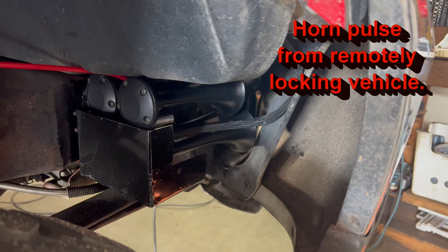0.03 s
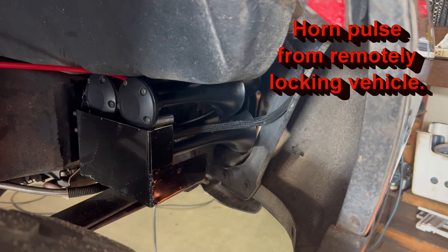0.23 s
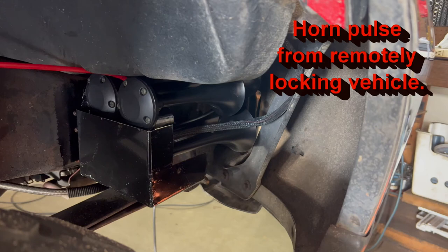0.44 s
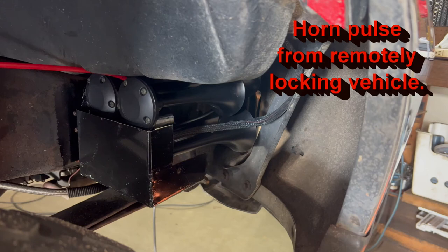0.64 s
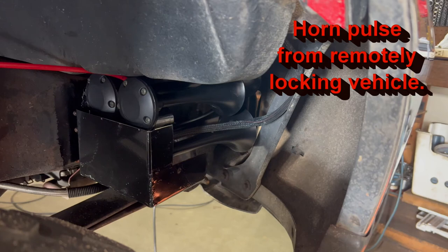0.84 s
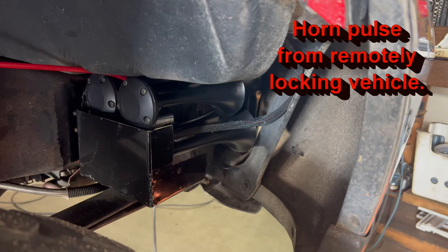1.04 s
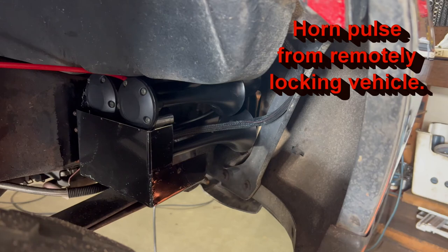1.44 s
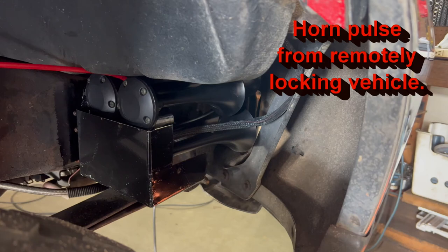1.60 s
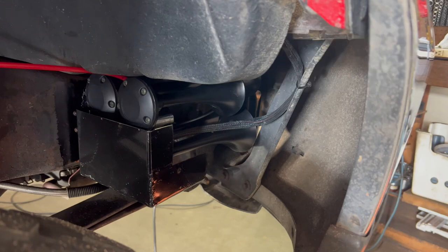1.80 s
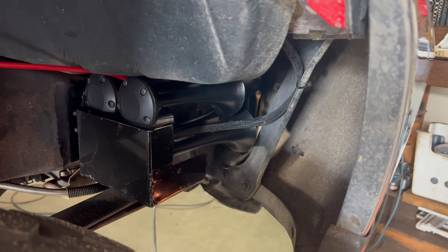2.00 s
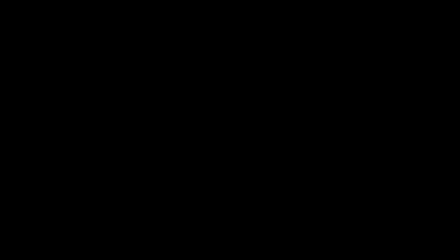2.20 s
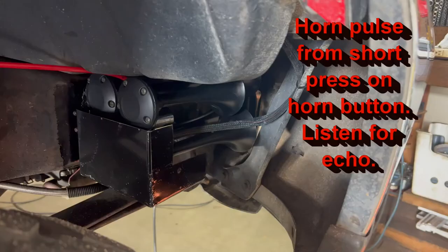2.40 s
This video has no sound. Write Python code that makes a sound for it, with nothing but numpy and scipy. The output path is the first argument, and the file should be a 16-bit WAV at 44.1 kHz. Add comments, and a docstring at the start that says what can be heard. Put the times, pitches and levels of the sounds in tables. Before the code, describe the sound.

An air horn under a vehicle gives one loud, very short two-tone blast at about 0.25 seconds, close up, with a pop and spit of air. Its echo holds until around 0.6 seconds and fades by about 1.2. Faint rustles, ticks and soft thuds follow over a quiet low rumble, with a light scuff at 2.1 seconds, a momentary dropout at 2.3 and a dull knock at 2.4.

```python
"""Under a vehicle, close up: a two-trumpet air horn gives one very short blast.
The valve pops and spits air, two diaphragms buzz a 40 ms chord into flared pipes,
and the surroundings ring on with near and far reflections. Later come faint rustles,
ticks, soft thuds and a scuff over a low rumble; the sound drops out once, briefly."""
import sys
import numpy as np
from scipy import signal
from scipy.fft import rfft, irfft
from scipy.io import wavfile
from scipy.ndimage import uniform_filter1d

SR = 44100
rng = np.random.default_rng(int(sys.argv[2]) if len(sys.argv) > 2 else 0)


def unload_wav(signal):
    """Save mono or channel-first audio to the path in sys.argv[1] as 16-bit WAV at rate SR, clipped to [-1, 1]."""
    wavfile.write(
        sys.argv[1],
        SR,
        np.round(np.clip(np.atleast_2d(signal).T, -1, 1) * 32767).astype(np.int16),
    )


N = 112454
T, HZ = np.arange(N) / SR, np.fft.rfftfreq(N, 1 / SR)

# Left-right likeness of noise and echoes: freq_hz, correlation
STEREO_CORRELATION = [(60, .95), (200, 0.67), (400, 0.52), (800, .25), (3000, 0.26), (15000, .35)]
# Background rumble: freq_hz, density_db
RUMBLE_SPECTRUM = [(25, -10.5), (45, -4), (65, 0.5), (100, -1), (150, -10.5), (220, -13), (350, -21.5),
                   (600, -27.5), (1100, -33.5), (2500, -40), (7000, -43), (16000, -57.5)]
# Its envelope: time_s, level_db
RUMBLE_LEVEL = [(0, -69.5), (.5, -64.5), (1.1, -65), (1.5, -61.5), (1.75, -68), (2.15, -63.5), (2.5, -60)]
# Low roll after the blast: freq_hz, density_db
ROLL_SPECTRUM = [(25, -15), (60, 0), (150, 0.5), (250, -6.5), (500, -43.5), (2000, -75)]
# Its envelope: time_s, level_db
ROLL_LEVEL = [(.48, -85), (.53, -51.5), (.65, -53), (.8, -66), (1.0, -81)]
# Rustle: freq_hz, density_db
RUSTLE_SPECTRUM = [(100, -3.5), (350, 0.5), (700, -2), (1300, -6.5), (2200, -12), (4500, -17.5),
                   (8000, -19), (12000, -28), (16000, -34)]
# Its envelope: time_s, level_db
RUSTLE_LEVEL = [(1.0, -89.5), (1.26, -77), (1.285, -68), (1.34, -66), (1.39, -65), (1.44, -68),
                (1.55, -73.5), (1.59, -68.5), (1.66, -76.5), (1.882, -77.5), (1.889, -61.5), (2.03, -60.5),
                (2.1, -62.5), (2.27, -68.5), (2.315, -84), (2.375, -69), (2.39, -52.5), (2.44, -55.5),
                (2.55, -63)]
# Dull rub: freq_hz, density_db
RUB_SPECTRUM = [(200, -9), (600, -1), (1200, -1), (2200, -11.5), (5000, -21), (12000, -35)]
# Bright scuff and ticks: freq_hz, density_db
SCUFF_SPECTRUM = [(800, -19), (2000, -5.5), (3200, -5), (4200, -5), (5500, 3), (6800, -1), (8500, -0.5),
                  (12000, -6), (16000, -8.5)]
# Ticks: start_s, level_db
TICKS = [(1.274, -72), (1.501, -62.5), (1.772, -71)]
# Soft thuds: start_s, boom_db, knock_hz, knock_db, boom_t60_s, tap_db
THUDS = [(1.418, -68, 400, -58.5, .2, -72.5), (1.582, -69.5, 600, -73, 0.23, -70),
         (1.814, -71, 330, -71, 0.16, -84), (1.886, -50, 185, -41, 0.63, -47),
         (2.015, -62, 328, -62, 0.25, -56.5), (2.383, -41.5, 330, -32, 0.7, -57)]
# Boom of a thud: knock_pitch_ratio, density_db
BOOM_SPECTRUM = [(.12, -9), (.3, -8.5), (.7, -4), (1, -3), (1.6, -11), (3, -36.5), (8, -49), (30, -60)]
# Tap of a thud: freq_hz, density_db
TAP_SPECTRUM = [(150, -11), (400, 5), (950, 3), (1500, -13), (3000, -31), (10000, -40)]
# Reflections: freq_hz, near_db, far_db, far_hold_s, far_t60_s
REFLECTIONS = [(100, -11, -9, .28, 0.99), (250, -7, -11, .28, 0.93), (420, -2, -4.5, .275, 0.49),
               (780, -10, -10, .275, .6), (1150, -10.5, -14.5, .29, .7), (2000, -9, -14, .33, 0.69),
               (3500, -12, -15.5, .35, 0.47), (4800, -12, -19, .35, .6), (7500, -11, -26, .33, .6),
               (14000, -22, -42, .3, .4)]
# Air hiss: freq_hz, density_db
HISS_SPECTRUM = [(500, -12.5), (1500, 4.5), (3000, 3), (4500, -10.5), (6500, -0.5), (8700, 1.5),
                 (12000, -1), (16000, -10)]
# Puff through the valve: freq_hz, density_db
PUFF_SPECTRUM = [(30, -9), (110, -12), (235, 0), (310, -8), (420, -2), (700, -8), (1500, -13), (2500, -34),
                 (6000, -54.5)]
# Its envelope: time_s, level_db
PUFF_LEVEL = [(.2, -67), (.222, -50.5), (.234, -36), (.239, -24), (.244, -24), (.252, -31), (.28, -48),
              (.32, -74)]
# Pipe modes rung by the first slug of air: freq_hz, level_db
POP_MODES = [(425, -6), (720, -20), (1450, -22)]
# Low trumpet, first harmonic up: level_db, left_minus_right_db
LOW_HARMONICS = [(-23.5, 1.5), (-19.5, 9.5), (-16, 0.5), (-22.5, -4.5), (-35, 3), (-31, 0.5), (-38, 4.5),
                 (-41.5, 2.5), (-40.5, 8.5), (-45.5, 5)]
# High trumpet, first harmonic up: level_db, left_minus_right_db
HIGH_HARMONICS = [(-26, -8), (-18.5, 0), (-22, -1.5), (-29, 2), (-29.5, 4), (-37, 0), (-43, 2), (-50, -1.5)]
# Microphone notches: centre_hz, width_hz, gain_db
MIC_NOTCHES = [(10280, 560, -24.5), (13800, 480, -23.5)]


def amp(db):
    """Decibels to gain."""
    return 10 ** (np.asarray(db) / 20)


def unit(x):
    """Scale to rms 1."""
    return x / np.sqrt(np.mean(x ** 2) + 1e-20)


def lookup(points, hz):
    """Interpolate a table over log frequency."""
    freq_hz, value = np.transpose(points)
    return np.interp(np.log(hz + 1), np.log(freq_hz), value)


def envelope(points):
    """Gain over time from time_s, level_db rows."""
    return amp(np.interp(T, *np.transpose(points)))


def decay(age_s, t60_s):
    """Unity until age 0, then 60 dB down per t60_s."""
    return amp(-60 * np.maximum(age_s, 0) / t60_s)


def burst(start_s, rise_s, hold_s, t60_s):
    """Linear attack, hold, exponential release."""
    return np.clip((T - start_s) / rise_s, 0, 1) * decay(T - start_s - rise_s - hold_s, t60_s)


def wander(samples):
    """Smoothed random signal, rms 1."""
    return unit(uniform_filter1d(rng.standard_normal(N), samples))


def noise(spectrum=None, left_db=2):
    """Partly correlated stereo noise, rms 1; white by default."""
    a, b = rfft(rng.standard_normal((2, N)))
    corr = lookup(STEREO_CORRELATION, HZ)
    left, right = a * amp(left_db), corr * a + np.sqrt(1 - corr ** 2) * b
    colour = 1 if spectrum is None else amp(lookup(spectrum, HZ))
    return unit(irfft([left * colour, right * colour], N))


def rumble():
    """Low background, plus a roll coming back after the blast."""
    floor = noise(RUMBLE_SPECTRUM) * envelope(RUMBLE_LEVEL)
    return floor + noise(ROLL_SPECTRUM) * envelope(ROLL_LEVEL)


def handling(grain_db=1.58):
    """Grainy rustle, one bright scuff, tiny ticks and a dull rub."""
    grain = amp(grain_db * wander(250))
    rustle = noise(RUSTLE_SPECTRUM) * envelope(RUSTLE_LEVEL)
    scuff = amp(-51) * burst(2.108, rise_s=.024, hold_s=.025, t60_s=.32)
    ticks = sum(amp(db) * burst(start_s, rise_s=.0013, hold_s=0, t60_s=.09) for start_s, db in TICKS)
    bright = noise(SCUFF_SPECTRUM) * (scuff + ticks)
    rub = amp(-60.5) * noise(RUB_SPECTRUM) * burst(1.345, rise_s=.036, hold_s=.0116, t60_s=.147)
    return (rustle + rub) * grain + bright


def thud(start_s, boom_db, knock_hz, knock_db, boom_t60_s, tap_db, peak_cycles=1.6):
    """A tap, a dull knock of a few cycles and its boom in the surroundings."""
    tap = amp(tap_db) * noise(TAP_SPECTRUM) * burst(start_s, rise_s=.00079, hold_s=.0017, t60_s=.091)
    cycles = np.maximum(T - start_s, 0) * knock_hz
    swell = (cycles / peak_cycles * np.exp(1 - cycles / peak_cycles)) ** 2
    knock = amp(knock_db) * swell * np.sin(2 * np.pi * cycles)
    boom = amp(boom_db) * noise([(ratio * knock_hz, db) for ratio, db in BOOM_SPECTRUM])
    return tap + knock + boom * burst(start_s, rise_s=.004, hold_s=0, t60_s=boom_t60_s)


def surroundings(source, sag_db_per_s=19, drop_db=5, drop_s=.04, onset_s=.0076):
    """Near reflections die fast; far ones hold until the farthest wall has answered, then fade."""
    rows, response = np.array(REFLECTIONS), np.zeros((2, N))
    for far in (False, True):
        hz, t, bands = signal.stft(noise(), SR, nperseg=512)
        hz = hz[:, None]
        near_db, far_db, hold_s, t60_s = (lookup(rows[:, [0, col]], hz) for col in (1, 2, 3, 4))
        if far:
            sag = amp(-sag_db_per_s * t - drop_db * np.clip((t - hold_s) / drop_s, 0, 1))
            distant_ring = amp(-22.5) * decay(t, t60_s=1.7) / (1 + (hz / 2500) ** 2)
            fade = sag * decay(t - hold_s, t60_s) + distant_ring
        else:
            fade = decay(t, t60_s=.33)
        fade *= np.minimum(t / onset_s, 1)
        fade /= np.sqrt(N * np.mean(fade ** 2, axis=-1, keepdims=True))  # unit energy per band
        bands = bands * fade * amp(far_db if far else near_db)
        response += signal.istft(bands, SR, nperseg=512)[1][:, :N]
    return signal.fftconvolve(source.mean(axis=0)[None], response, axes=1)[:, :N]


def valve_hiss():
    """The valve spits a short, bright jet of air."""
    return amp(-17) * noise(HISS_SPECTRUM) * burst(.2345, rise_s=.008, hold_s=.001, t60_s=.085)


def valve_pop(start_s=.2376, length_s=.0085, mount_hz=236.7):
    """The first slug of air pops the pipes with a low puff; the jolt rings the mounting."""
    t = np.clip(T - start_s, 0, length_s)
    window = np.sqrt(abs(np.sin(np.pi * t / length_s)))
    pipes = window * sum(amp(db) * np.sin(2 * np.pi * hz * t) for hz, db in POP_MODES)
    flowing = (T > PUFF_LEVEL[0][0]) & (T < PUFF_LEVEL[-1][0])
    puff = noise(PUFF_SPECTRUM) * envelope(PUFF_LEVEL) * flowing
    jolt = amp(-17) * burst(start_s, rise_s=.0022, hold_s=0, t60_s=.12)
    return pipes + puff + jolt * np.sin(2 * np.pi * mount_hz * (T - start_s))


def trumpet(harmonics, start_s, length_s, pitch_hz):
    """A diaphragm buzzes into a flared pipe; the tone brightens and dulls with the air pressure."""
    attack_s, release_s, dulling_s = .015, .006, .013
    scoop_depth, scoop_s, rise_per_s, jitter = .045, .005, .9, .012
    count, buzz_db, flutter_depth, spread_rad = 24, -53, .17, .94
    t = np.maximum(T - start_s, 0)
    scoop = scoop_depth * np.exp(-t / scoop_s)  # pitch comes from below as pressure builds
    glide = rise_per_s * (np.minimum(t, 2 * length_s) - length_s / 2)
    cycles = np.cumsum(pitch_hz * (1 - scoop + glide + jitter * wander(120))) / SR
    release = np.exp(-np.maximum(t - length_s, 0) / release_s)
    tone = np.zeros((2, N))
    for k in range(1, count + 1):
        level_db, pan_db = harmonics[k - 1] if k <= len(harmonics) else (buzz_db, 0)
        gain = np.sqrt(2) * amp(level_db + np.array([[.5], [-.5]]) * pan_db)
        # Upper harmonics come last and leave first.
        attack = np.minimum(t / attack_s, 1) ** (np.sqrt(k) / 2)
        dulling = max(k / 2, 1) ** (-np.maximum(t - .79 * length_s, 0) / dulling_s)
        right_lead_rad = np.array([[0], [spread_rad]]) * min(k * pitch_hz / 1200, 1)
        phase_rad = 2 * np.pi * (k * cycles + rng.random()) + right_lead_rad
        flutter = 1 + flutter_depth * unit(uniform_filter1d(wander(130), 130))
        tone += gain * attack * release * dulling * flutter * np.cos(phase_rad)
    return tone


def scene():
    """The blast and its echoes, then small noises over the rumble."""
    chord = trumpet(LOW_HARMONICS, start_s=.2395, length_s=.0325, pitch_hz=388)
    chord += trumpet(HIGH_HARMONICS, start_s=.2352, length_s=.033, pitch_hz=486)
    pop, hiss = valve_pop(), valve_hiss()
    # The trumpets point outward and reach the surroundings best.
    echoes = surroundings(chord + amp(-15) * pop + amp(-2) * hiss)
    return chord + pop + hiss + echoes + rumble() + handling() + sum(thud(*row) for row in THUDS)


def record(dry, clip_level=.92, dropout_s=(2.277, 2.311), cutoff_hz=16000):
    """Two microphone notches, overload, a brief dropout and a low-pass."""
    notches = amp(sum(db * np.exp(-((HZ - hz) / width_hz) ** 2) for hz, width_hz, db in MIC_NOTCHES))
    clipped = np.clip(irfft(rfft(dry) * notches, N), -clip_level, clip_level)
    gate = uniform_filter1d(1. * ((T < dropout_s[0]) | (T > dropout_s[1])), 64)
    lowpass = signal.firwin(511, cutoff_hz, window=("kaiser", 9), fs=SR)
    return signal.oaconvolve(clipped * gate, lowpass[None], "same")


dry = scene()
out = record(dry)
unload_wav(out)
```